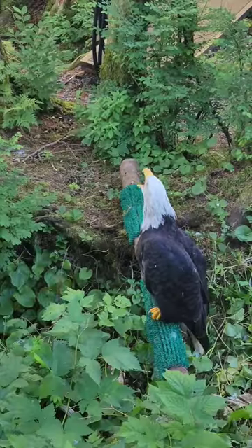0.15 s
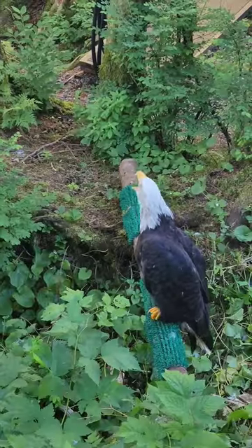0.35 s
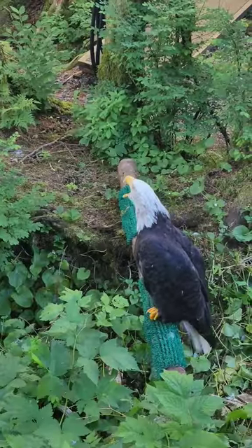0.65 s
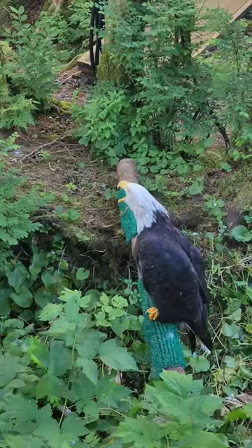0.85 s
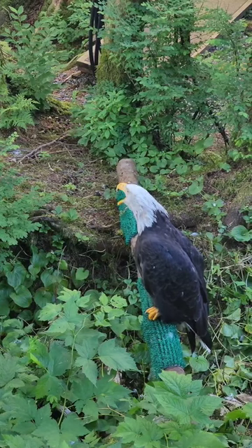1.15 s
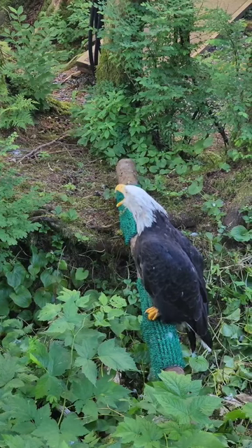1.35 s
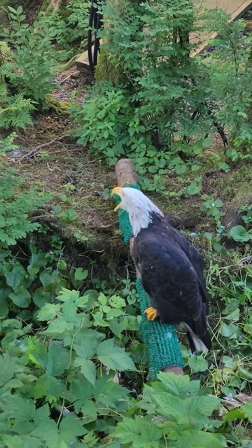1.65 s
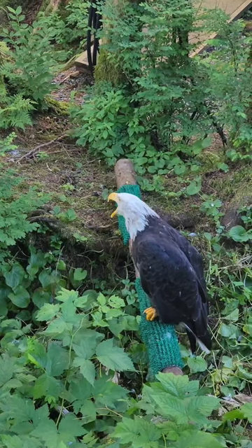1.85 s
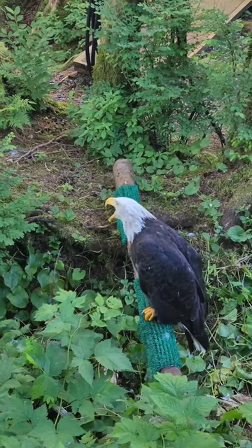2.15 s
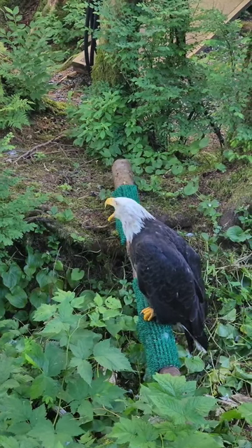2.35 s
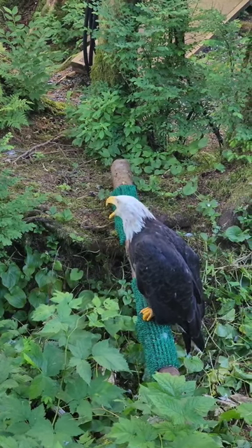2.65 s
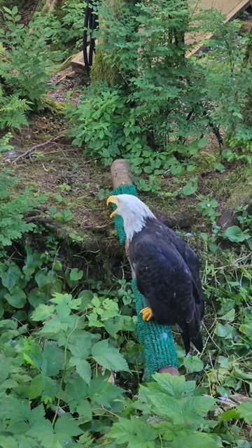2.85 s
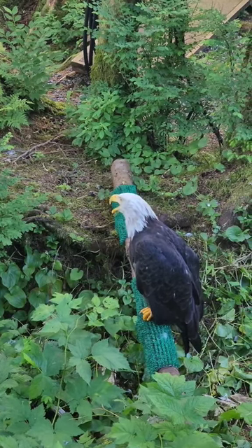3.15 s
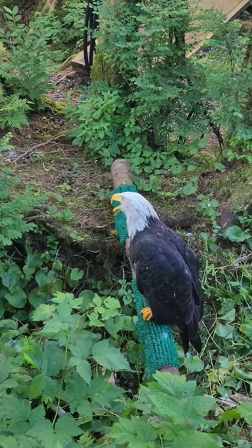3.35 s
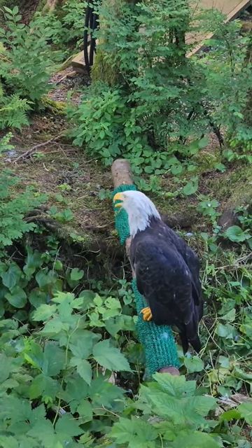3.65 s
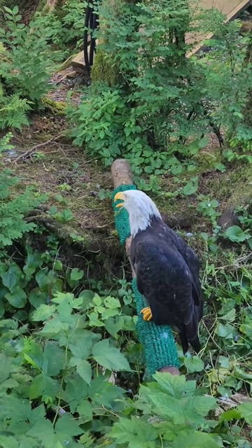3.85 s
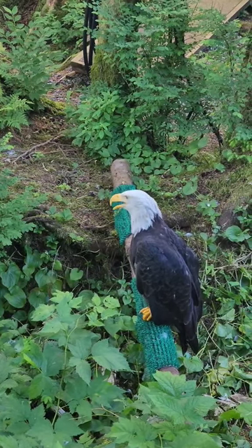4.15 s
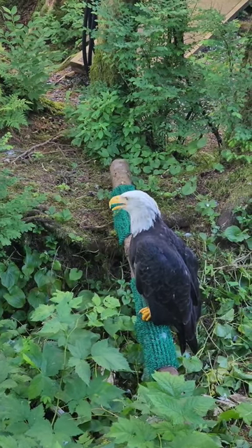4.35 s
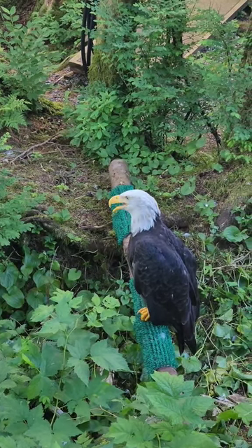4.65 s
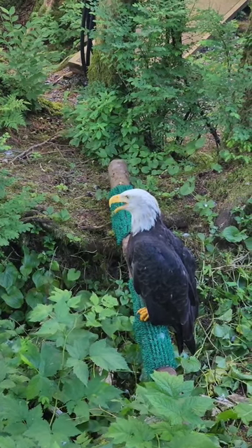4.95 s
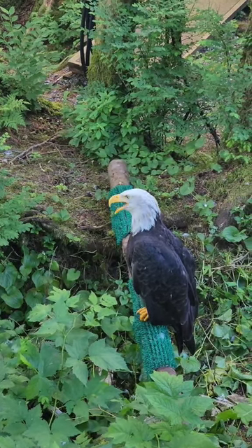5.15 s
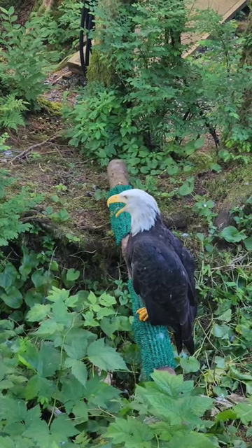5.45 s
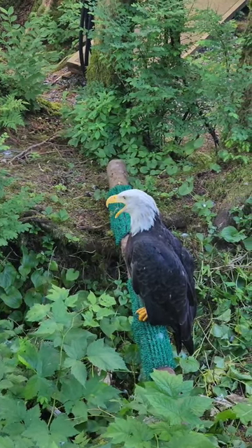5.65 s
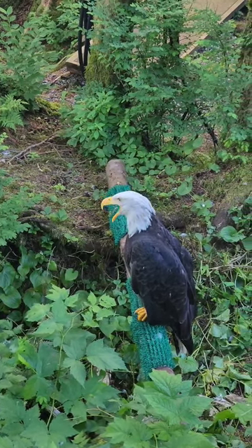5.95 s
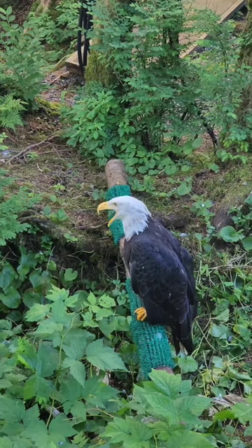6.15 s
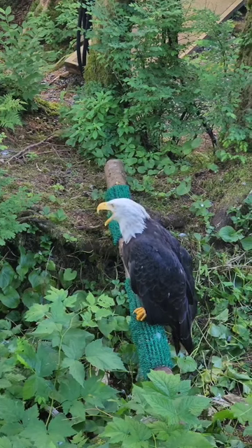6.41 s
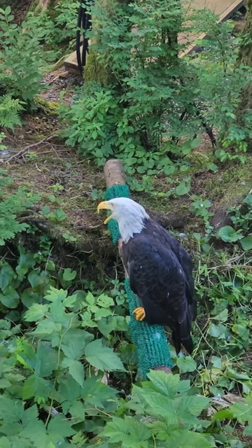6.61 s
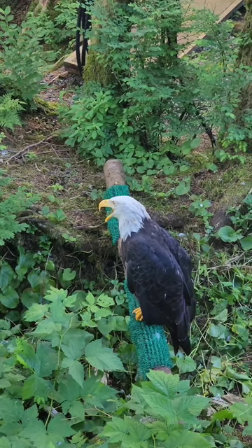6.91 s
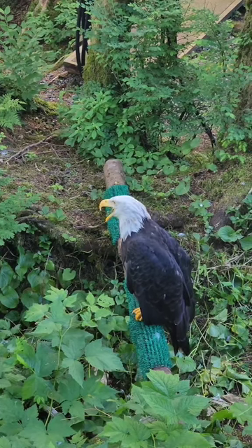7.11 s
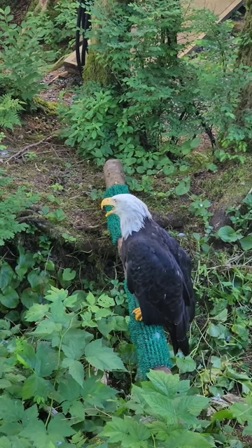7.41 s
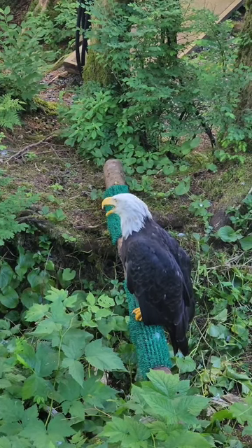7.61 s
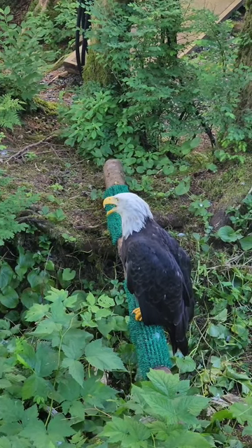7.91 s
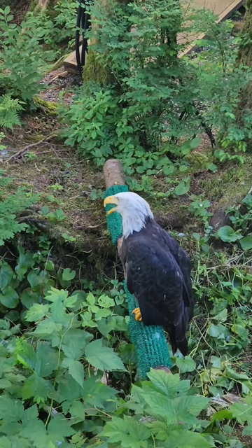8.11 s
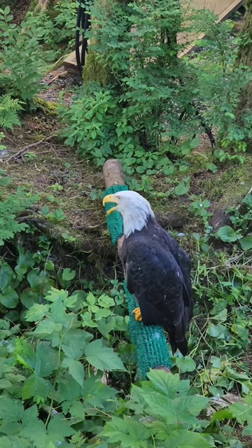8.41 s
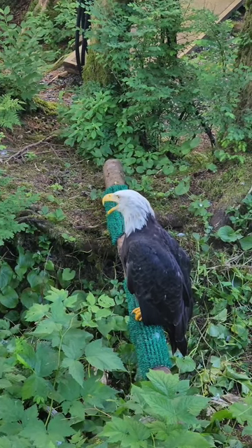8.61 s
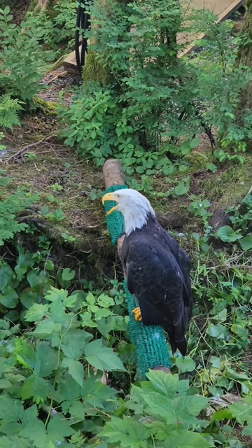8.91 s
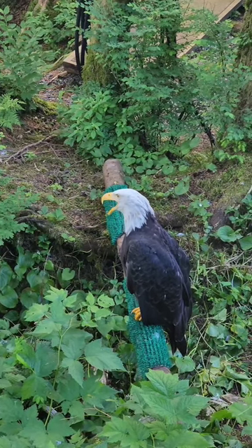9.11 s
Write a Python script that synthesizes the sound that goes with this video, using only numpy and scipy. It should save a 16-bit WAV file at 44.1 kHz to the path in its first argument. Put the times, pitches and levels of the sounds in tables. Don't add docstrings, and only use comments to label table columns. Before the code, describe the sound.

Outdoors among trees, a phone a few metres from an eagle picks up soft steady stream hiss, far traffic rumble and a low engine hum that fades around 2.5-3.2 s. At 0.2-0.75 s the eagle gives rapid sharp yelps with raspy breath, mixed with distant eagles' squeals. From 1.7 to 3 s it pipes a run of short high whistles, roughly 3-4 kHz falling towards 2 kHz, spacing out as it goes. Faint clucks and small upward squeaks follow; a dull finger tap lands at 3.4 s. Distant birds chitter, scattered and echoing, until about 5.7 s. At 6 s the loudest run begins: five strong, even chirps near 3.2 kHz, then lower, slower, weaker ones sinking to 1.3 kHz by 7.6 s. Soft clucks and distant thin replies continue to 8.7 s, with a last far pip at 9.2 s while traffic swells slightly.

```python
import sys
import numpy as np
from scipy import signal
from scipy.fft import rfft, irfft
from scipy.io import wavfile
from scipy.ndimage import uniform_filter1d, minimum_filter1d

SR = 44100
rng = np.random.default_rng(int(sys.argv[2]) if len(sys.argv) > 2 else 0)


def undo_db(level):
    steps = np.asarray(level, float) / 20
    return 10 ** steps


def generate_wav(signal):
    frames = np.transpose(np.atleast_2d(signal))
    scaled = np.clip(frames, -1, 1) * 32767
    pcm = np.round(scaled).astype(np.int16)
    wavfile.write(sys.argv[1], SR, pcm)


N = 408807

# (time [s], left minus right [dB])
NEAR_SIDE = [
    (0.0, 9),
    (0.5, -0.5),
    (1.32, 11.5),
    (1.81, 4.5),
    (2.9, 2.5),
    (3.6, -4),
    (5.9, 2.5),
    (6.8, 6.5),
    (7.3, 4),
]
# (time [s], length [s], pitch [Hz], level [dB], octave partial [dB])
YELPS = [(0.227, 0.011, 3000, -14, -1), (0.236, 0.0095, 3083, -12.5, -2), (0.244, 0.014, 3080, -14.5, -8),
         (0.243, 0.021, 3774, -23, 2), (0.258, 0.027, 3750, -17, -14), (0.287, 0.019, 3710, -17, -10),
         (0.36, 0.017, 3900, -28, -22), (0.624, 0.026, 2154, -25.5, -12), (1.638, 0.069, 3024, -39.5, 9),
         (0.658, 0.015, 3090, -13, -20), (0.716, 0.022, 3960, -23.5, -28.5)]
# (time [s], length [s], pitch [Hz], level [dB], octave partial [dB])
FIRST_RUN = [(1.763, 0.02, 3845, -17.5, -30), (1.826, 0.018, 3200, -14, -17.5),
             (1.86, 0.02, 3920, -20.5, -23), (1.973, 0.013, 3970, -15.5, -33),
             (1.976, 0.03, 3104, -15.5, -13), (2.08, 0.043, 3182, -14, -9.5),
             (2.219, 0.048, 3060, -16, -13.5), (2.38, 0.043, 2956, -19.5, -13),
             (2.534, 0.0456, 2304, -19.5, -9), (2.733, 0.027, 2115, -15.5, -16),
             (2.933, 0.026, 2112, -17, -13), (3.112, 0.041, 1751, -34.5, -12)]
# (time [s], length [s], pitch [Hz], level [dB], octave partial [dB])
SECOND_RUN = [(5.995, 0.049, 3126, -12.5, -6.5), (6.089, 0.053, 3142, -11, -14.5),
              (6.209, 0.047, 3253, -11, -14.5), (6.34, 0.048, 3228, -13.5, -16),
              (6.478, 0.039, 3105, -14.5, -15), (6.634, 0.044, 2430, -15.5, -12),
              (6.794, 0.041, 2403, -17.5, -7), (6.976, 0.0434, 2220, -18.5, -14),
              (7.19, 0.035, 2186, -23.5, -12.5), (7.421, 0.026, 1814, -29.5, -17.5),
              (7.614, 0.024, 1303, -35, -14)]
# (time [s], length [s], pitch [Hz], level [dB])
STRAYS = [(3.1, 0.016, 3600, -38), (0.71, 0.031, 2600, -32), (0.55, 0.014, 3200, -41),
          (3.6, 0.039, 1700, -36), (2.22, 0.081, 3100, -35), (2.085, 0.013, 4150, -29.5),
          (6.638, 0.0085, 3500, -28), (4.126, 0.025, 1945, -28), (6.255, 0.015, 2900, -29),
          (6.49, 0.039, 2520, -37), (6.04, 0.029, 2780, -20.5), (6.385, 0.022, 1980, -41),
          (7.431, 0.025, 1375, -33.5)]
# (time [s], length [s], first pitch [Hz], pitch reached [Hz], level [dB])
OPENERS = [(0.197, 0.013, 1790, 2130, -25.5), (0.215, 0.021, 2484, 3070, -25.5),
           (0.644, 0.022, 2460, 3050, -25), (1.703, 0.024, 3300, 3820, -50),
           (1.825, 0.017, 2730, 3120, -21.5), (2.65, 0.024, 1760, 2030, -32.5),
           (2.656, 0.029, 2540, 2940, -32.5), (2.979, 0.021, 1770, 2125, -29.5),
           (2.992, 0.018, 2610, 2900, -31.5), (3.275, 0.026, 1820, 2220, -31),
           (3.292, 0.025, 2540, 2950, -34), (3.563, 0.019, 1870, 2250, -30),
           (3.577, 0.026, 2580, 3070, -35), (4.03, 0.015, 2230, 2450, -44), (4.047, 0.078, 2520, 2210, -48),
           (4.137, 0.026, 1810, 1720, -41.5), (3.12, 0.023, 1380, 1190, -38),
           (3.531, 0.025, 1330, 1140, -40), (5.163, 0.018, 1910, 2280, -31), (5.175, 0.03, 2440, 2910, -39),
           (5.977, 0.025, 4430, 5110, -29), (0.222, 0.025, 5600, 6260, -33.5),
           (0.657, 0.03, 5500, 6230, -39), (5.543, 0.02, 1910, 2450, -32.5),
           (5.559, 0.021, 2740, 3080, -34), (5.97, 0.022, 2090, 2530, -16),
           (5.986, 0.016, 2448, 2576, -10.5), (7.204, 0.025, 1515, 1196, -32.5),
           (7.205, 0.022, 2030, 1760, -33), (6.657, 0.044, 2300, 2150, -30),
           (6.816, 0.034, 2296, 2115, -31), (6.992, 0.029, 1450, 1200, -44.5)]
# (time [s], share of pitch lost [1/s], level lost over the note [dB])
SLACKEN = [(0.23, -2, -3), (0.245, -0.3, 1), (0.62, -0.5, -1), (0.66, 0.5, -5), (0.72, -0.5, 5),
           (1.83, -1, 6.5), (1.98, 2, -2), (2.08, 1.2, -8), (2.22, 0.2, 2), (2.38, 0.7, 8), (2.54, 2.2, -2),
           (2.74, -1.3, -2.5), (5.99, -0.3, 2.5), (6.09, -0.5, -0.5), (6.21, 0, -2), (6.34, -0.1, 2.5),
           (6.55, -0.2, 0.5), (6.9, 1.5, 15), (7.2, 1, -3)]
# (time [s], roughness [0-1])
ROUGH = [(0, .5), (1.9, .5), (2.0, .7), (2.6, .65), (2.7, .15), (3.2, .2), (3.3, .5), (5.9, .3), (6.05, .3),
         (6.1, .5), (9.27, .5)]
# (time [s], peak level [dB], pitch [Hz])
CLUCKS = [
    (3.061, -47, 1290),
    (3.1235, -53, 1730),
    (3.998, -50, 1730),
    (7.693, -44.5, 1376),
    (7.844, -44, 1190),
]
# (time [s], length [s], level [dB])
RASPS = [(0, 0.023, -39.5), (0.265, 0.13, -32.5), (0.364, 0.14, -39), (0.651, 0.083, -31),
         (1.679, 0.078, -35), (1.807, 0.12, -33.5), (2.536, 0.051, -42.5), (3.3, 0.082, -58),
         (3.601, 0.058, -51.5), (5.301, 0.076, -43.5), (5.604, 0.13, -49), (5.993, 0.014, -24),
         (6.07, 0.04, -30.5), (6.636, 0.025, -33), (7.797, 0.06, -47)]
# (time [s], length [s], pitch [Hz], level [dB])
FAR_NOTES = [(0.21, 0.0087, 2110, -25.5), (0.212, 0.056, 2745, -38), (0.296, 0.021, 3050, -20),
             (0.349, 0.024, 3100, -33.5), (0.57, 0.017, 2900, -33), (0.786, 0.092, 2880, -33.5),
             (0.941, 0.087, 2794, -36), (1.099, 0.035, 2735, -30.5), (1.292, 0.032, 2624, -34.5),
             (2.685, 0.081, 2910, -43.5), (3.01, 0.04, 2890, -39), (3.071, 0.0088, 2990, -31),
             (3.14, 0.125, 2905, -47), (3.307, 0.094, 2700, -43.5), (3.524, 0.041, 2525, -41),
             (3.593, 0.049, 2780, -40), (3.669, 0.044, 3050, -40.5), (3.782, 0.063, 2894, -46),
             (3.97, 0.039, 2730, -53.5), (0.254, 0.04, 2060, -42), (4.514, 0.013, 2240, -32.5),
             (4.536, 0.054, 3100, -45.5), (5.062, 0.048, 2853, -39.5), (5.169, 0.02, 2875, -35),
             (5.209, 0.088, 2836, -41.5), (5.341, 0.058, 3118, -42), (5.56, 0.017, 3102, -29),
             (7.695, 0.062, 3035, -35), (8.409, 0.028, 3080, -34), (8.455, 0.074, 3100, -45),
             (8.58, 0.036, 3043, -34), (8.708, 0.014, 2100, -38),
             (0.002, 0.012, 3790, -30.5), (0.03, 0.054, 3820, -44.5), (0.11, 0.08, 3755, -53),
              (0.203, 0.035, 3680, -33.5), (0.33, 0.076, 3743, -35), (0.397, 0.1, 3510, -47),
              (0.511, 0.043, 3696, -35), (0.61, 0.094, 3490, -40), (0.784, 0.019, 3660, -33),
              (0.935, 0.026, 3630, -35), (1.093, 0.018, 3556, -37), (1.622, 0.051, 3790, -39),
              (1.717, 0.11, 3936, -37), (2.158, 0.055, 3690, -36.5), (2.259, 0.03, 3447, -33.5),
              (2.681, 0.058, 3510, -36.5), (2.749, 0.014, 3680, -34), (2.804, 0.014, 3500, -34.5),
              (2.84, 0.046, 3694, -34.5), (2.952, 0.034, 3754, -35.5), (3.022, 0.037, 3550, -36),
              (3.042, 0.11, 3596, -40.5), (3.201, 0.067, 3430, -41.5), (3.291, 0.088, 3160, -40.5),
              (3.315, 0.0676, 3830, -36), (3.468, 0.046, 3740, -41), (3.39, 0.07, 3840, -44.5),
              (3.53, 0.11, 3850, -45.5), (3.634, 0.054, 3900, -43.5), (4.541, 0.092, 3600, -45),
              (4.58, 0.1, 3755, -51), (4.593, 0.084, 3480, -49), (4.659, 0.087, 3620, -50),
              (4.914, 0.07, 3780, -47), (5.051, 0.062, 3580, -51.5), (5.183, 0.03, 3754, -30),
              (5.245, 0.055, 3720, -41.5),
             (0.31, 0.054, 4200, -42), (0.39, 0.035, 6050, -54), (0.398, 0.068, 4660, -41.5),
            (3.303, 0.047, 4540, -46), (3.59, 0.049, 4580, -48), (1.64, 0.12, 4760, -42),
            (1.839, 0.031, 5220, -42), (1.942, 0.02, 4840, -30), (1.943, 0.04, 4570, -38),
            (2.061, 0.017, 4280, -32.5), (2.85, 0.13, 4570, -43.5), (3.182, 0.09, 4700, -47.5),
            (4.568, 0.041, 4270, -43), (4.629, 0.092, 5510, -52), (4.758, 0.05, 4630, -46),
            (5.07, 0.034, 5800, -54.5), (2.08, 0.022, 7420, -40.5), (1.705, 0.03, 7480, -36.5),
            (1.743, 0.017, 5900, -31.5), (1.872, 0.021, 7380, -37.5), (5.296, 0.053, 5670, -46.5),
            (5.317, 0.025, 4890, -37), (5.373, 0.066, 4880, -53.5), (8.008, 0.194, 5020, -55.5),
            (5.571, 0.024, 3870, -34.5), (5.61, 0.035, 3930, -32), (5.7, 0.036, 4910, -44.5),
            (5.57, 0.062, 7850, -42), (5.685, 0.05, 5540, -46.5), (0.916, 0.018, 4270, -46),
            (1.075, 0.02, 4290, -50), (7.814, 0.057, 5950, -49), (6.022, 0.03, 4090, -35),
            (6.083, 0.025, 4110, -37.5), (7.805, 0.028, 5020, -36.5), (7.85, 0.014, 3920, -35.5),
            (7.942, 0.0093, 4210, -28.5), (7.95, 0.018, 4966, -32), (7.978, 0.018, 3983, -34),
            (8.113, 0.066, 3973, -35), (8.255, 0.079, 3836, -36.5)]
# (time [s], peak level [dB], pitch [Hz])
PIPS = [
    (0.168, -28.5, 2590),
    (3.8847, -31.5, 2700),
    (4.813, -29, 2880),
    (4.9413, -31, 2830),
    (5.391, -27.5, 2650),
    (9.235, -30, 2623),
]
# (note pitch [Hz], level [dB])
FAR_OCTAVE = [(2100, -29), (2800, -10), (3100, -21), (3650, -16.5), (3950, -21), (4900, -27)]
# (time [s], left minus right [dB])
FAR_SIDE = [(0.0, 3), (0.07, -3.5), (5.65, 3), (6.84, 2), (7.2, -3.5), (9.27, 4)]
# (frequency [Hz], level [dB per Hz])
WOODS = [(71, -31), (120, -1), (163, -7), (383, -13), (424, -12), (612, -11), (750, -10.5), (957, -9.5),
         (1990, -15.5), (2160, -13), (2700, -18.5), (3450, -17.5), (3670, -20.5), (8980, -31.5),
         (12000, -47), (15600, -64)]
# (frequency [Hz], level [dB per Hz])
GROUND = [(12, -36.5), (20, -8), (70, 0), (140, -8), (180, -37), (310, -120)]
# (time [s], rumble [dB], engine hum and deep bass [dB])
RUMBLE = [(0.0, -38, -57), (0.15, -46.5, -44.5), (2.17, -48, -45.5), (3.72, -48.5, -55.5), (6.48, -50, -57),
          (9.27, -43.5, -50.5)]
# (frequency [Hz], likeness [0-1])
LIKENESS = [(60, 0.76), (130, 0.92), (290, 0.8), (640, 0.45), (1410, 0), (3100, 0.2), (6820, 0), (15000, 0)]
# (frequency [Hz], gain [dB])
MIC = [(7000, 2.5), (8300, -1), (10000, -7.5), (12500, 6), (15500, 7.5)]

STRAIN_HZ = 2900
SLACK_DROOP = 0.65
PORT_LAG_S = 0.0001
CUT_HZ = 15700


def eagle():
    voice, air = np.zeros(N), breath()
    rise_s, flutter_db = 0.011, 2.2
    upper_db = (-21.5, -29, -39, -41)
    times, sag, fade_db = np.array(SLACKEN).T
    rough_times, roughness = np.array(ROUGH).T
    strays = [row + (-27.5,) for row in STRAYS]
    notes = []
    for s, length, hz, db, octave_db in YELPS + FIRST_RUN + SECOND_RUN + strays:
        half_fall = np.interp(s, times, sag) * length / 2
        notes.append((s, length, hz * (1 + half_fall), hz * (1 - half_fall), db, octave_db,
                      np.interp(s, times, fade_db), np.interp(s, rough_times, roughness)))
    for row in OPENERS:
        notes.append(row + (-15.5, 0, np.interp(row[0], rough_times, roughness)))
    for s, note in syrinx(notes, rise_s, fall_s=0.008, waver=0.0081, flutter_db=flutter_db, hoarse=0.13,
                          upper_db=upper_db, scoop=0.028, droop=0.05):
        add(voice, note, s)
    clucks = [(s, 0.028, hz * 1.1, hz * 0.99, db + 4.5, -28, 0, 0.2) for s, db, hz in CLUCKS]
    for s, note in syrinx(clucks, rise_s, fall_s=0.023, waver=0.0026, flutter_db=flutter_db, hoarse=0.07,
                          upper_db=upper_db, scoop=0, droop=0):
        add(voice, note, s)
    direct = ports(voice + air, curve(NEAR_SIDE, 1), PORT_LAG_S)
    echo = trees(voice + 0.6 * air, early_db=-10.5, early_t60=0.19, late_db=-19, late_t60=0.8, damp_hz=7600)
    return direct + echo


def breath():
    out = np.zeros(N)
    puff = unit(band(band(rng.standard_normal(N), 30, 600), 30, 800))
    puff *= undo_db(3.5 * walk(120))
    wide = band(band(rng.standard_normal(N), 2100, 7600), 1600, 8000)
    wide = unit(wide * undo_db(2.5 * walk(90)))
    edge = unit(band(band(rng.standard_normal(N), 8400, 15000), 11000, 15500))
    edge *= undo_db(-33 + 6 * walk(30))
    rasp_first_hz, rasp_last_hz, rasp_wide_db, gasp_wide_db = 5890, 5330, -3.5, -8
    forced = [note for note in FIRST_RUN + SECOND_RUN[1:] if note[2] > STRAIN_HZ]
    gasps = [(s - 0.017, 0.035, db - 21, 5800, 4260, gasp_wide_db) for s, length, hz, db, _ in forced]
    trails = [(s + length, 0.022, db - 24, rasp_first_hz, 5200, gasp_wide_db)
              for s, length, hz, db, _ in forced]
    rasps = [row + (rasp_first_hz, rasp_last_hz, rasp_wide_db) for row in RASPS]
    puffs = gasps + trails + rasps
    beaks = 1 + 0.035 * rng.standard_normal((len(puffs), 2))
    for (s, length, db, first_hz, last_hz, wide_db), beak in zip(puffs, beaks):
        t = np.arange(int(1.85 * length * SR)) / SR
        at = int(s * SR) + np.arange(len(t))
        hz = np.interp(t, [0, length], [first_hz, last_hz] * beak)
        shape = np.sin(np.pi * (t / t[-1]) ** 0.54)
        resonance = puff[at] * np.sin(2 * np.pi * np.cumsum(hz) / SR)
        hiss = resonance + undo_db(wide_db) * wide[at] + edge[at]
        add(out, undo_db(db) * shape * hiss, s - 0.15 * length)
    return out


def syrinx(notes, rise_s, fall_s, waver, flutter_db, hoarse, upper_db, scoop, droop):
    pitch_walk, size_walk, octave_walk = walk(200), walk(130), walk(170)
    grit = unit(band(band(rng.standard_normal(N), 40, 380), 40, 380))
    beat = np.array([walk(260) + 1j * walk(260) for _ in range(2)]) / np.sqrt(2)
    for s, length, first_hz, last_hz, db, octave_db, fade_db, rough in notes:
        t = np.arange(int((length + 4 * fall_s) * SR)) / SR
        at = np.clip(int(s * SR) + np.arange(len(t)), 0, N - 1)
        strain = 1 if first_hz > STRAIN_HZ else SLACK_DROOP
        onset = np.exp(-t / 0.006)
        ending = np.clip((t - length) / fall_s + 1, 0, 2)
        bend = waver * pitch_walk[at] - scoop * onset - droop * strain * ending
        hz = np.interp(t, [0, length], [first_hz, last_hz]) * (1 + bend)
        phase = 2 * np.pi * np.cumsum(hz) / SR + hoarse * strain * grit[at]
        rise = np.sin(np.pi / 2 * np.clip(t / rise_s, 0, 1)) ** 2
        shape = rise * np.exp(-(np.maximum(t - length + fall_s, 0) / fall_s) ** 2)
        shares = np.clip([rough, rough + 0.25], 0, 1)
        sides = [np.sqrt(1 - share ** 2) + share * wobble[at] for share, wobble in zip(shares, beat)]
        upper = np.imag(sides[1] * np.exp(2j * phase))
        for k, part_db in enumerate(upper_db, start=3):
            if k * first_hz < CUT_HZ * 1.05:
                upper = upper + undo_db(part_db) * np.sin(k * phase)
        tone = undo_db(flutter_db * size_walk[at]) * np.imag(sides[0] * np.exp(1j * phase))
        tone = tone + undo_db(octave_db + flutter_db * octave_walk[at]) * shape * upper
        yield s, np.sqrt(2) * undo_db(db - fade_db * (t / length - 0.5)) * shape * tone


def neighbours():
    voice = np.zeros(N)
    pips = [(s, 0.03, hz, db - 13.0) for s, db, hz in PIPS]
    notes = [(s, length, hz, hz, db, colour(FAR_OCTAVE, hz), 0, 0.45)
             for s, length, hz, db in FAR_NOTES + pips]
    for s, note in syrinx(notes, rise_s=0.005, fall_s=0.0076, waver=0.009, flutter_db=2.5, hoarse=0.15,
                          upper_db=(-11, -21.5, -37, -46.5), scoop=0.02, droop=0.022):
        add(voice, note, s)
    direct = ports(voice, curve(FAR_SIDE, 1), PORT_LAG_S)
    return direct + trees(voice, early_db=-3, early_t60=0.33, late_db=-7, late_t60=0.62, damp_hz=8300)


def trees(x, early_db, early_t60, late_db, late_t60, damp_hz):
    t = np.arange(int(1.5 * SR)) / SR
    sparse = rng.standard_normal((2, len(t))) * (rng.random((2, len(t))) < 0.08)
    early = sparse * undo_db(-60 * t / early_t60) * (t > 0.002)
    late = band(rng.standard_normal((2, len(t))), 1700, damp_hz)
    late = late * undo_db(-60 * t / late_t60) * np.clip(t / 0.017, 0, 1)
    echo = undo_db(early_db) * early / np.sqrt(np.sum(early ** 2) / 2)
    echo = echo + undo_db(late_db) * late / np.sqrt(np.sum(late ** 2) / 2)
    return signal.fftconvolve(x[None], echo, axes=1)[:, :N]


def ports(x, pan_db, lag_s):
    hz = np.arange(N // 2 + 1) * SR / N
    lag = np.minimum(2 * np.pi * hz * lag_s, np.pi / 2)
    late = irfft(rfft(x) * np.exp(-1j * lag), N)
    return np.array([x * undo_db(pan_db / 2), late * undo_db(-pan_db / 2)])


def knock():
    t = np.arange(int(0.02 * SR)) / SR
    out = np.zeros(N)
    push = np.exp(-t / 0.00045)
    rebound = 0.33 * np.sin(2 * np.pi * 110 * t) * np.exp(-t / 0.016)
    add(out, undo_db(-22) * (push - rebound), 3.435)
    return band(out, 40, 3500)


def woods():
    hz = np.maximum(np.arange(N // 2 + 1) * SR / N, 1)
    alike = np.clip(colour(LIKENESS, hz), 0, 1) ** 0.65
    mid, side = rfft(rng.standard_normal((2, N))) * np.sqrt([1 + alike, 1 - alike])
    both = np.array([mid + side, (mid - side) * np.exp(-2j * np.pi * hz * PORT_LAG_S)])
    hiss = irfft(both * undo_db(colour(WOODS, hz)) * (hz > 130), N)
    hiss *= undo_db(-45) / np.std(band(hiss, 150, 1100)) * undo_db(0.7 * walk(1.5) + 0.4 * walk(9))
    bass = both * undo_db(colour(GROUND, hz))
    rumble = unit(irfft(bass * (hz > 58) * (hz <= 130), N))
    rumble = rumble * undo_db(curve(RUMBLE, 1) + 1.5 * walk(5))
    deep = unit(irfft(bass * (hz <= 58), N))
    hum_hz = 48.4 * (1 + 0.012 * walk(3))
    hum = np.sin(2 * np.pi * np.cumsum(hum_hz) / SR)
    near_engine = np.clip((3.2 - np.arange(N) / SR) / 0.66, 0, 1)
    engine = undo_db(curve(RUMBLE, 2)) * ((1 - 0.5 * near_engine) * deep + 1.33 * near_engine * hum)
    return hiss + rumble + engine


def unit(x):
    return x / np.sqrt(np.mean(x ** 2))


def walk(rate, size=N):
    k = int(SR / rate)
    steps = np.repeat(rng.standard_normal(size // k + 1), k)
    return unit(uniform_filter1d(uniform_filter1d(steps, k), k)[:size])


def band(x, lo_hz, hi_hz):
    sos = signal.butter(2, [lo_hz, min(hi_hz, 0.45 * SR)], "band", fs=SR, output="sos")
    return signal.sosfilt(sos, x)


def curve(table, column):
    table = np.array(table)
    return np.interp(np.arange(N) / SR, table[:, 0], table[:, column])


def colour(table, hz):
    table = np.array(table)
    return np.interp(np.log(hz), np.log(table[:, 0]), table[:, 1])


def add(track, sound, s):
    i = max(int(s * SR), 0)
    track[..., i:i + sound.shape[-1]] += sound[..., :N - i]


def scene():
    return eagle() + neighbours() + knock() + woods()


def roll_off(x):
    return signal.sosfilt(signal.butter(12, 15710, fs=SR, output="sos"), x)


def record(dry):
    hz = np.maximum(np.arange(N // 2 + 1) * SR / N, 1)
    dry = irfft(rfft(dry) * undo_db(colour(MIC, hz)) * (hz < CUT_HZ), N)
    headroom = np.minimum(1, 0.93 / np.maximum(np.abs(dry).max(axis=0), 1e-6))
    gain = uniform_filter1d(minimum_filter1d(headroom, size=441), size=221)
    return roll_off(dry * gain)


dry = scene()
out = record(dry)
generate_wav(out)
```